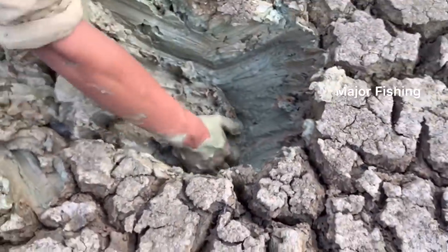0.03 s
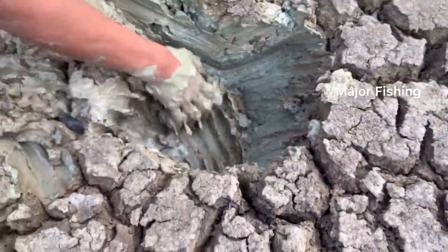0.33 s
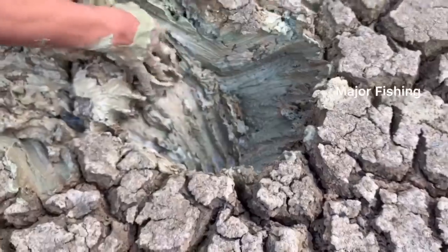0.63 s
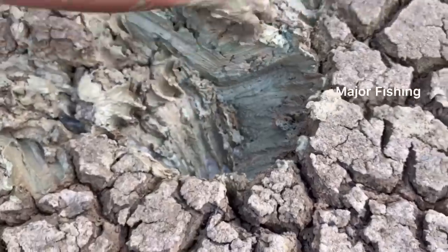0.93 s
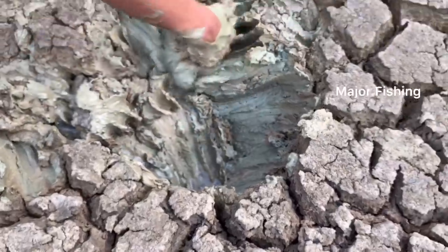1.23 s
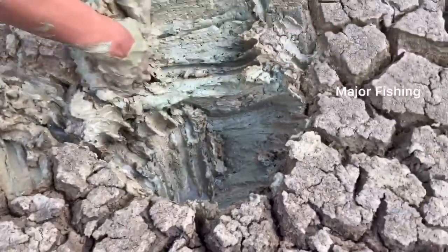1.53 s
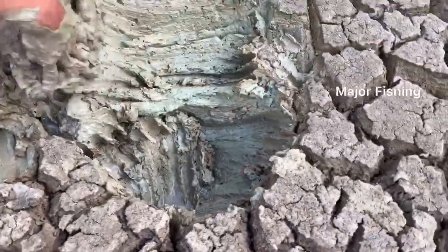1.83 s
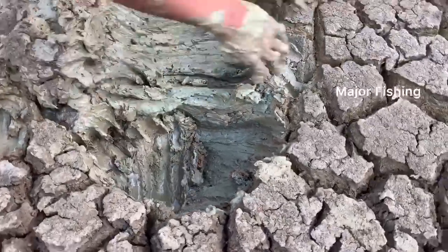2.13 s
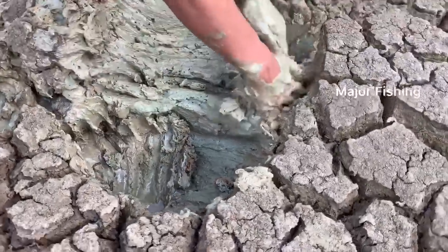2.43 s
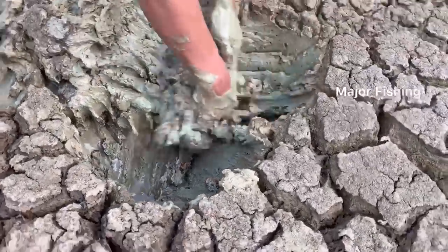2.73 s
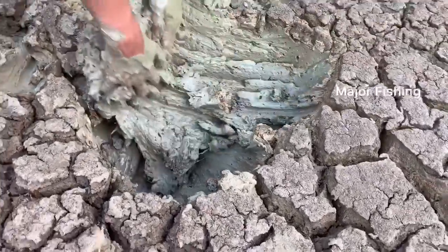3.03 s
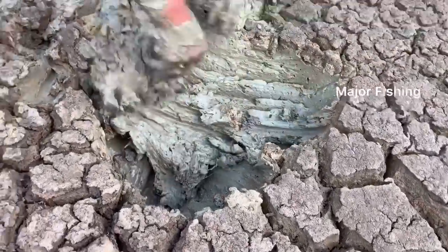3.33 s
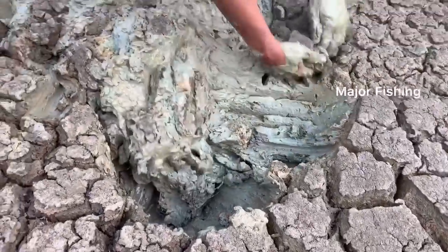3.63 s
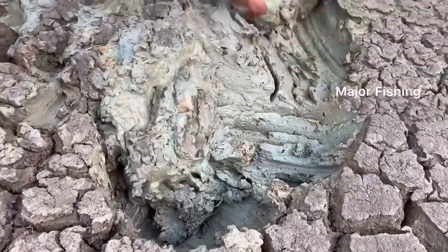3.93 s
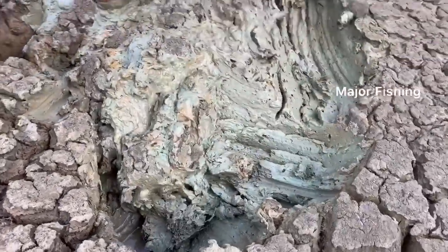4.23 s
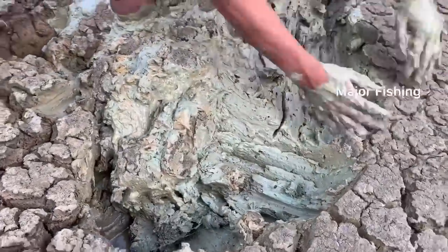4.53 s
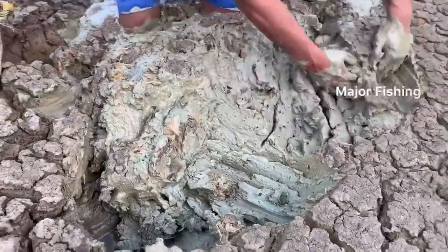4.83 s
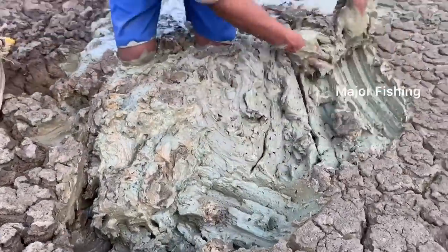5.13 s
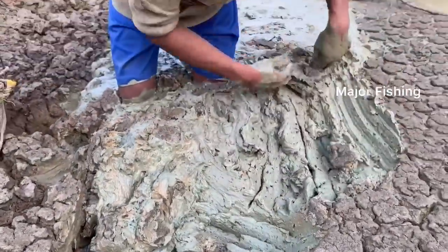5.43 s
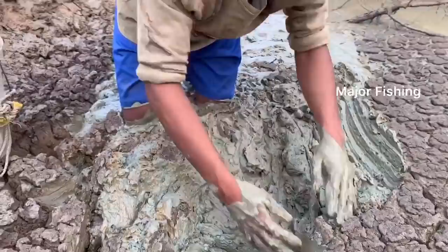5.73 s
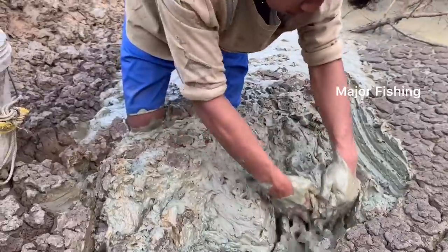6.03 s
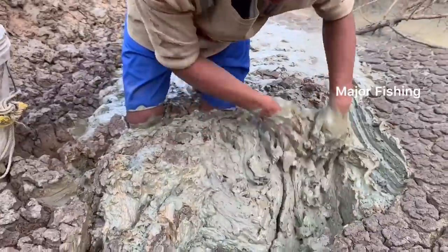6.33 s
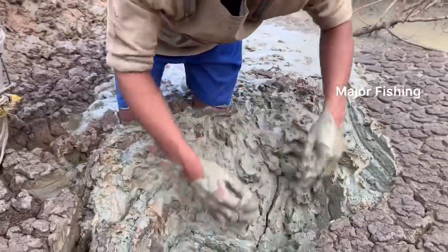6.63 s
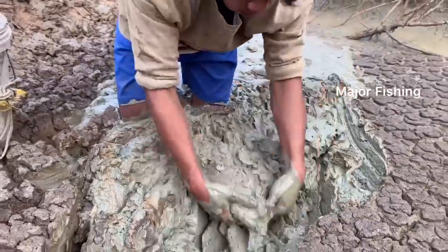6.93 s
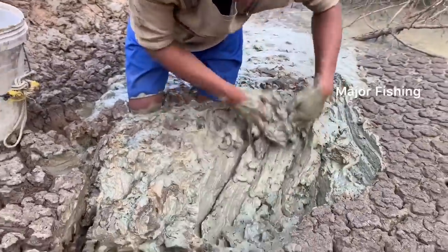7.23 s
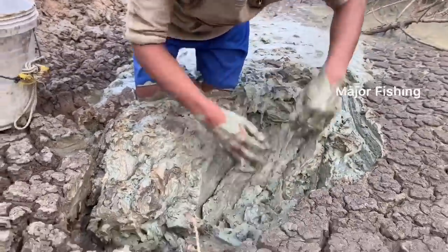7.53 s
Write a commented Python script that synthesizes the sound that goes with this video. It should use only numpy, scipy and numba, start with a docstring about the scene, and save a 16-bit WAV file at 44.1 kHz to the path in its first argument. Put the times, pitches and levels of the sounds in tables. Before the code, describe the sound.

Bare hands work wet, sticky clay outdoors, about a metre from a hand-held microphone, in uneven strokes with short lulls. For the first second, light smearing gives a fine crackle over a thin wet hiss. From 1 second the hands dig harder and air pockets pop and smack, easing around 2 seconds, then peaking in a loud squelching smack at 2.7 seconds. From about 3.4 to 5.2 seconds, flat palms swish over the slurry among more pops and small plops. Soft low handling thumps and faint rumble come and go, strongest from 4.5 to 6 seconds. Sticky strokes continue, with tiny suction squeaks near 6.3 seconds and brief wet spits around 6.7 to 6.9 seconds. Lighter strokes and plops carry on until nearly 8 seconds. The clay ticks faintly after each stroke, over a barely audible outdoor hush.

```python
"""Bare hands smear wet, sticky clay over cracked ground, outdoors, a metre from a hand-held camera.
Light strokes come first: tiny air pockets tear open and crackle over the hiss of the wet film.
From 1 s the hands dig harder; larger pockets pop and smack, loudest at 2.7 s. From 3.4 s flat palms
swish on the slurry. The camera body thumps softly as it is moved, most from 4.5 to 6 s. Closing gaps
squeak near 6.3 s, and the last strokes spit and plop. The open air stays almost still throughout."""
import sys
import numpy as np
from scipy import signal
from scipy.fft import rfft, irfft, next_fast_len
from scipy.io import wavfile
from numba import njit

SR = 44100
rng = np.random.default_rng(int(sys.argv[2]) if len(sys.argv) > 2 else 0)


def bounce(signal):
    """Save signal as a 16-bit WAV file at the path given by the first command-line argument."""
    frames = np.transpose(np.atleast_2d(signal))
    limited = np.clip(frames, -1, 1)
    pcm = np.round(limited * 32767).astype(np.int16)
    wavfile.write(sys.argv[1], SR, pcm)


N = 343539
PORT_LAG_S = .000065  # left microphone port leads
LOW_PAN_DB = 1.5  # low pops and squelch; every pan is left minus right

ATTACK_DB_PER_S, RELEASE_DB_PER_S, TICKING_DB_PER_S = 329, 150, 42
# clay at rest: drag/dB, fine crackle/dB, squelch/dB
REST_DB = [-84, -91, -88]
# ticking after a stroke, re that stroke: drag/dB, fine crackle/dB, squelch/dB
AFTER_STROKE_DB = [-19, -9.5, -36]
# hand strokes: t/s, length/s, drag level/dB, swell/dB, fine/dB re drag, squelch/dB re drag, pan/dB
HAND_STROKES = [(0.019, .64, -65.5, 2, 3.5, -14, -1), (0.72, .07, -71, -3, 4, -16, -2),
                (1.0, .05, -63, 6, 4.5, -15, -4), (1.07, .37, -54.5, 3, 1, -7, -2),
                (1.499, .05, -56, -3, -0.5, -15, -1), (1.619, .26, -64, -1.5, 3.5, -25, -0.5),
                (1.94, .14, -67, -3, -0.5, -13.5, 0), (2.194, .04, -69, -0.5, 8.5, -21, -3),
                (2.35, .25, -52.5, 0, 0, -25, -4), (2.678, .09, -49, 0, 0.5, -4, -6.5),
                (2.812, .09, -54.5, -1, 4, 1.5, -0.5), (3.041, .09, -60.5, 1, 7, -11.5, -2),
                (3.198, .03, -58, -0.5, -1.5, -16, 0), (3.4, .11, -66, 5, 3, -27, -4),
                (3.562, .16, -50, 4, -0.5, -11, -0.5), (3.749, .19, -47, 2, -3.5, -15, -7),
                (4.021, .3, -62.5, -7, 3, -17, -1), (4.61, .12, -52, -2, -1, -12.5, -10.5),
                (4.78, .43, -57.5, -1, 0.5, -14, -2), (5.271, .1, -69, -3, 8.5, -22, -4),
                (5.504, .03, -66, -6, -2, -4, -4), (5.809, .11, -57, 5, -1.5, -20, -2),
                (5.965, .23, -52, 1, -3.5, -34, -4), (6.242, .03, -57, -2, -5, -26, 8),
                (6.35, .08, -58, 1, -5, -5.5, 0), (6.519, .03, -64, -1, 0.5, -30, 10),
                (6.77, .08, -52.5, 2, -5, -12, 0), (6.967, .11, -58, -1, 0.5, -6.5, 1.5),
                (7.16, .23, -65, -1, 0, -30, -1), (7.576, .02, -65, 0, 1, -6, 11),
                (7.73, .06, -62, 4.5, -3, -3.5, 9)]


def stroking():
    """Hands dig in, hold and let go; the clay ticks on. Returns drag, fine, squelch and pan in dB."""
    t = np.arange(0, N, 32) / SR
    layers = undb(REST_DB)[:, None] ** 2
    weighted_pan = 0
    for start, length, db, swell_db, fine_db, squelch_db, pan_db in HAND_STROKES:
        held_db = db + swell_db * (np.clip((t - start) / length, 0, 1) - .5)
        held_db -= ATTACK_DB_PER_S * np.maximum(start - t, 0)
        after_s = np.maximum(t - start - length, 0)
        ticking_db = np.array(AFTER_STROKE_DB)[:, None] - TICKING_DB_PER_S * after_s
        power = undb(held_db - RELEASE_DB_PER_S * after_s) ** 2 + undb(held_db + ticking_db) ** 2
        layers = layers + power * undb([0, fine_db, squelch_db])[:, None] ** 2
        weighted_pan = weighted_pan + power[0] * pan_db
    return curves(np.transpose([t, *(10 * np.log10(layers)), weighted_pan / layers[0]]))


FILM_DB, FILM_DB_PER_DB = -2.5, 0.067  # hiss re crackle at peak drag; slope with drag
FACING_DB_PER_DB = 0.032  # extra rasp as a hand faces one port
# smeared clay as heard through the camera's microphone, with its treble notches: f/Hz, level/dB
CLAY_THROUGH_MIC = [(88, -12.5), (150, 6.5), (376, 5), (637, -8), (759, -3.5), (1240, -6), (1690, -4),
                    (3160, -5.5), (5250, -10), (6260, -5), (9080, -9.5), (10400, -5), (11900, -23.5),
                    (13400, -7), (16000, -50)]


def smearing(drag_db, fine_db, squelch_db, pan_db):
    """Hands stick and slip through the clay: crackle over the hiss of the wet film."""
    slip = undb(3 * walk(260) + 2 * walk(70))
    grains = crackle(undb(.35 * drag_db), slip ** 2, cycles=1.48, spread_db=5,
                     pan_spread_db=-2.0, lag_spread_s=.00005, count=48000)
    stereo_treble = colour(rng.standard_normal((2, N)), [(300, -29.0), (1500, 12.5), (4000, 9.5)])
    film = unit(slip * (rng.standard_normal(N) + stereo_treble))
    film_db = FILM_DB + FILM_DB_PER_DB * (drag_db - drag_db.max())
    clay = colour(grains + undb(film_db) * film, CLAY_THROUGH_MIC)
    # deep folds squelch, finger furrows crackle, thin slurry fizzes
    squelch = unit(colour(clay, [(150, 3.0), (500, 6.0), (800, -37.0), (1400, -62), (3000, -91)]))
    furrows = unit(colour(clay, [(250, -10.5), (500, 5.5), (750, 11.5), (3800, 11.5),
                                 (6000, -9.0), (12000, -26.0)]))
    fizz = unit(colour(clay, [(1500, -92), (3200, -4.0), (5000, 4.5)]))
    # the camera body shades the far port's treble
    treble = colour(furrows, [(900, -40), (1700, -10), (2600, 0)])
    furrows += (undb(sides(pan_db) + FACING_DB_PER_DB * np.abs(pan_db)) - 1) * treble
    return (squelch * undb(squelch_db + sides(LOW_PAN_DB))
            + furrows * undb(drag_db)
            + fizz * undb(fine_db + 0.21 * sides(pan_db)))


def crackle(pace, flurry, cycles, spread_db, pan_spread_db, lag_spread_s, count):
    """Tiny air pockets tear open: dense in a hard stroke, lone ticks as the clay settles."""
    when, pitch, tear, sign = rng.random((count, 4)).T
    length, pan, lag = rng.standard_normal((count, 3)).T
    t = np.arange(N) / SR
    chance = np.cumsum(pace * flurry)
    start = np.interp(when, chance / chance[-1], t)
    hz = 120 + 15000 * pitch ** 2.4
    # heavy-tailed sizes, weighted to even out power over pitch and pace
    size_db = spread_db * np.minimum(hz / 1200, 1) ** 0.4 * np.minimum(-np.log(1 - tear), 4.8)
    gain = np.sign(sign - .5) * undb(size_db) * hz ** 0.31 / np.sqrt(np.interp(start, t, pace))
    ring_cycles = cycles * (hz / 2000) ** .5 * undb(2.89 * length)
    return unit(at_ports(start, gain, hz, ring_cycles, glide=0.0094, pan_db=pan_spread_db * pan * pitch,
                         lag_s=PORT_LAG_S + lag_spread_s * lag))


POCKET_GLIDE, SHADE_HZ = .12, 2320  # the camera body shades the far port above SHADE_HZ
GULP_DELAY_S, GULP_DB, GULP_PITCH_RATIO = 0.0012, -20.5, 0.485
# largest pockets: t/s, peak level/dB, f/Hz, rise/cycles
POCKET_POPS = [(0.063, -42.5, 1090, 0.99), (0.241, -37, 1885, 0.25), (0.2645, -41, 1690, 0.51),
               (0.3164, -35.5, 4210, 1.34), (0.567, -37.5, 1530, 0.52), (0.6037, -26.5, 5050, 3.5),
               (0.7255, -42, 5000, 1.3), (0.788, -49, 8250, 2), (0.8739, -39, 1380, 1.17),
               (1.031, -40, 3200, 1.3), (1.038, -39, 3166, 1.1), (1.0715, -30, 1710, 1.7),
               (1.0796, -31.5, 1700, 1.44), (1.133, -32, 1500, 1.44), (1.2073, -31.5, 1430, 0.49),
               (1.2454, -28, 2140, 0.34), (1.2541, -28, 2100, 0.83), (1.3253, -22, 6330, 8.6),
               (1.3568, -27, 2090, 1.03), (1.4061, -23.5, 1940, 1.06), (1.4309, -30, 1680, 2.3),
               (1.4594, -29, 3500, 0.88), (1.5135, -27.5, 4250, 3.2), (2.1338, -28, 4370, 1.04),
               (2.3514, -25.5, 3500, 1.1), (2.3852, -25, 1560, 0.97), (2.3878, -25, 1650, 1.43),
               (2.4361, -30.5, 2700, 0.65), (2.4475, -23.5, 1290, 0.55), (2.4546, -25.5, 1330, 1.5),
               (2.497, -27, 7750, 4.8), (2.539, -26, 1290, 0.26), (2.5803, -28, 1490, 0.72),
               (2.5967, -34, 1620, 0.53), (2.6334, -28, 1580, 1.3), (2.6792, -24.5, 1680, 0.32),
               (2.6892, -30, 2060, 0.49), (2.6973, -13, 1740, 1.11), (2.7071, -25, 4600, 0.63),
               (2.7362, -33, 1610, 0.68), (2.7524, -20.5, 2320, 1.35), (2.7633, -32, 2450, 1.2),
               (2.7851, -30, 4600, 3.8), (2.814, -27.5, 6020, 8.2), (2.8428, -23, 1520, 0.52),
               (2.872, -26.5, 2510, 1.6), (2.907, -29, 1920, 0.81), (2.9115, -22, 1390, 1.76),
               (3.042, -31, 3440, 1.25), (3.0557, -34, 1040, 0.85), (3.079, -31, 5400, 2.8),
               (3.2, -32.5, 6200, 3.7), (3.6396, -35, 2980, 1.46), (3.676, -24.5, 2620, 0.54),
               (3.7486, -30, 2430, 0.58), (3.7558, -24, 1710, 0.87), (3.7653, -28, 2240, 1.34),
               (3.7872, -29, 2930, 1.4), (3.809, -26, 2280, 0.74), (3.8171, -26, 2010, 0.96),
               (3.8393, -28, 2150, 0.88), (3.8643, -25, 2670, 1.2), (3.9043, -30, 2180, 1.4),
               (3.9075, -23.5, 3080, 1.3), (3.9159, -18, 2550, 0.55), (3.93, -23.5, 2320, 1.25),
               (3.9692, -24.5, 3400, 1.7), (4.058, -32, 1150, 0.47), (4.137, -32, 3350, 0.75),
               (4.38, -40, 3320, 0.61), (4.56, -28.5, 3100, 0.97), (4.6177, -25.5, 2780, 2.7),
               (4.6306, -23.5, 2640, 0.98), (4.6362, -23, 3600, 1.16), (4.678, -25, 3370, 1.5),
               (4.721, -28.5, 2070, 2.1), (4.7234, -25.5, 3580, 1.4), (4.7509, -33.5, 3550, 1.5),
               (4.8527, -31, 1590, 0.69), (4.8725, -34, 1500, 0.5), (4.984, -34.5, 3320, 1),
               (5.061, -33, 3540, 0.92), (5.0846, -40.5, 1600, 3.1), (5.2895, -29.5, 6340, 3.1),
               (5.3525, -45, 6000, 2.2), (5.391, -39.5, 4460, 2), (5.5013, -37, 1460, 0.32),
               (5.669, -45, 1580, 0.78), (5.7892, -29.5, 1710, 0.94), (5.848, -35.5, 2800, 2.1),
               (5.8935, -36.5, 1220, 1.3), (5.9307, -26.5, 2570, 0.62), (5.9888, -26, 3130, 2.2),
               (6.0167, -34, 2610, 1), (6.077, -30.5, 2780, 1.1), (6.0802, -26, 2330, 0.57),
               (6.0955, -26.5, 1680, 0.77), (6.114, -29.5, 1670, 1.8), (6.1544, -33, 1690, 1.2),
               (6.172, -30, 2600, 2.6), (6.1745, -34, 1650, 1.8), (6.1956, -32, 1140, 0.72),
               (6.2177, -41, 3000, 2.6), (6.3512, -35, 2330, 0.78), (6.377, -33.5, 1730, 0.63),
               (6.3964, -28, 1530, 1.5), (6.4133, -32, 1240, 1.43), (6.447, -37.5, 1520, 0.57),
               (6.7808, -31, 1920, 1.6), (6.8774, -35, 1960, 3.9), (7.0142, -27, 1650, 0.86),
               (7.0418, -26, 1850, 0.97), (7.045, -29.5, 1430, 0.8), (7.0921, -33, 1440, 1.1),
               (7.7678, -30.5, 2230, 0.81), (7.7695, -32.5, 1430, 0.94)]


def popping(drag_db, hand_pan_db):
    """Large pockets burst, ring briefly and gulp at a lower, sinking pitch as they open wider."""
    start, db, hz, cycles = np.vstack([POCKET_POPS, middling_pops(drag_db, count=90)]).T.copy()
    cycles = np.maximum(cycles, .3)
    shade = 1 / (1 + (SHADE_HZ / hz) ** 4)
    pan_db = LOW_PAN_DB * (1 - shade) + shade * np.interp(start, np.arange(N) / SR, hand_pan_db)
    glide = POCKET_GLIDE * (2 * rng.random(len(hz)) - 1)
    cavities = at_ports(start, undb(db), hz, cycles, glide, pan_db)
    threads = shredding(start, db, hz, pan_db, count=12)
    gulps = at_ports(start + GULP_DELAY_S, undb(db + GULP_DB) * (1 - shade), hz * GULP_PITCH_RATIO,
                     cycles=1.654, glide=-0.12, pan_db=LOW_PAN_DB)
    return cavities + threads + gulps


POP_OVER_DRAG_DB, POP_SCATTER_DB = 8.5, 9.5
POP_HZ, POP_SCATTER_OCTAVES, POP_CYCLES = 1960, 0.59, 1.29


def middling_pops(drag_db, count):
    """Middling pockets burst by chance, oftener and louder with drag. Rows as in POCKET_POPS."""
    when = rng.random(count)
    size, pitch, length = np.clip(rng.standard_normal((count, 3)).T, -2, 2)
    chance = np.cumsum(undb(.8 * drag_db))
    at = np.searchsorted(chance / chance[-1], when)
    db = drag_db[at] + POP_OVER_DRAG_DB + POP_SCATTER_DB * np.minimum(size, 1)
    hz = np.minimum(POP_HZ * 2 ** (POP_SCATTER_OCTAVES * pitch), SR / 4)
    cycles = POP_CYCLES * (hz / POP_HZ) ** .5 * undb(2 * length)
    return np.transpose([at / SR, db, hz, cycles])


SHRED_DB, SHRED_FADE_DB, SHRED_RUN_S = -12, 9, .004
SHRED_SCATTER_OCTAVES, SHRED_CYCLES = .5, 0.79


def shredding(start, db, hz, pan_db, count):
    """Clay threads snap in a quick, fading run after each burst: the rough edge of the smack."""
    start, db, hz, pan_db = np.repeat([start, db, hz, pan_db], count, axis=1)
    when, pitch, size, sign = rng.standard_normal((len(start), 4)).T
    when = when + .5
    late = np.abs(when)
    delay_s = SHRED_RUN_S * np.maximum(when, -late / 2)  # a few snap just before the burst
    thread_hz = np.minimum(hz * 2 ** (SHRED_SCATTER_OCTAVES * np.clip(pitch, -2, 2)), SR / 4)
    gain = np.sign(sign) * undb(db + SHRED_DB - SHRED_FADE_DB * late + np.minimum(2 * size, 2))
    cycles = SHRED_CYCLES * (thread_hz / POP_HZ) ** .5
    return at_ports(start + delay_s, gain, thread_hz, cycles, glide=0, pan_db=pan_db)


SLIDE_TRIM_DB, SLIDE_FLUTTER_DB, SLIDE_GRIT_DB, SLIDE_FADE_S = -5.5, 3.5, 1, 0.028
SWISH_WIDTH_SHARE, PALM_HZ, PALM_WIDTH_SHARE = 1.58, 754., 0.18
# palm slides: t/s, length/s, level before trim/dB, start f/Hz, end f/Hz, hollow/dB re swish, pan/dB
PALM_SLIDES = [(3.387, 0.37, -54.5, 1650, 2100, -10, 2), (3.679, 0.24, -54, 2700, 3140, -1.5, -12),
               (4.606, 0.12, -42.5, 3500, 3350, -27, -5.5), (4.801, 0.4, -58, 1900, 3120, -7.5, 2),
               (7.154, 0.19, -65, 1670, 1480, -2, 10), (7.399, 0.2, -61, 1653, 2220, -10.5, 7),
               (7.562, 0.025, -57.5, 2887, 3340, -3, 1)]


def sliding():
    """A palm glides on slurry: the swish's resonance moves with the gap, over the palm's hollow."""
    out = np.zeros((2, N))
    for start, length, db, from_hz, to_hz, palm_db, pan_db in PALM_SLIDES:
        span = np.arange(int((start - .1) * SR), min(int((start + length + .1) * SR), N))
        age = span / SR - start
        hz = np.interp(age, [0, length], [from_hz, to_hz])
        outside_s = np.maximum(-age, 0) + np.maximum(age - length, 0)
        rough_db = SLIDE_FLUTTER_DB * walk(300)[span] + SLIDE_GRIT_DB * walk(1500)[span]
        envelope = np.exp(-outside_s / SLIDE_FADE_S) * undb(db + rough_db + SLIDE_TRIM_DB)
        shared, left, right, deep = rng.standard_normal((4, N // 8))[:, :len(span)]
        swish = shared + 2.8 * np.array([left, right])
        for _ in range(2):
            swish = np.array([resonance(port, hz, SWISH_WIDTH_SHARE) for port in swish])
        hollow = unit(resonance(deep, np.full(len(span), PALM_HZ), PALM_WIDTH_SHARE))
        out[:, span] += envelope * (unit(swish) * undb(sides(pan_db)) + undb(palm_db) * hollow)
    return out


# spit spectrum: f/Hz, level/dB
SPIT_SPECTRUM = [(300, -27), (1800, 13), (7000, 8), (10500, 4), (12000, 0), (13500, 7), (16000, -15)]
# suction releases: t/s, peak rms level/dB, rise/s, pan/dB
SUCTION_SPITS = [(1.709, -43, 0.00083, -2), (2.132, -45, 0.00069, 1), (2.187, -56, 0.00084, 2),
                 (2.214, -54, 0.0016, 0), (5.4469, -43, 0.00013, -2), (5.64, -46, 0.00058, 3),
                 (5.65, -56, 0.00082, -1), (5.786, -39.5, 0.0014, -1), (6.703, -47.5, 0.0028, -1),
                 (6.712, -40.5, 0.0014, 4), (6.9014, -36.5, 0.0006, 5)]


def spitting():
    """A palm pulls free and the film between skin and clay spits."""
    envelope = np.zeros((2, N))
    for start, db, rise_s, pan_db in SUCTION_SPITS:
        first = int(start * SR)
        age = np.arange(1024) / SR / rise_s
        envelope[:, first:first + len(age)] += age * np.exp(1 - age) * undb(db + sides(pan_db))
    noise = rng.standard_normal(N) + 6.0 * rng.standard_normal((2, N))
    return envelope * unit(colour(noise, SPIT_SPECTRUM))


# mud lumps: t/s, peak level/dB, f/Hz
MUD_PLOPS = [(0.597, -53, 597), (0.689, -50.5, 610), (2.698, -32, 796), (3.679, -42, 785),
             (3.819, -43, 840), (3.866, -46, 810), (3.922, -38.5, 756), (4.944, -41.5, 810),
             (6.976, -41, 1300), (6.782, -48.5, 724), (7.046, -49.5, 716), (7.071, -39, 895),
             (7.094, -48, 800), (7.336, -48.5, 890), (7.665, -44.5, 1510)]


def plopping():
    """Soft lumps of mud plop, each falling in pitch."""
    start, db, hz = np.transpose(MUD_PLOPS).copy()
    return at_ports(start, undb(db), hz, cycles=2.2, glide=-0.344, pan_db=0)


# closing gaps: t/s, peak level/dB, f/Hz
GAP_SQUEAKS = [(6.23, -40.5, 1534), (6.241, -38, 2590), (6.305, -45.5, 2140), (6.364, -45, 3800)]


def squeaking():
    """Suction squeaks, rising in pitch as a gap closes."""
    start, db, hz = np.transpose(GAP_SQUEAKS).copy()
    return at_ports(start, undb(db), hz, cycles=6.3, glide=0.12, pan_db=-5)


KNOCK_CYCLES, KNOCK_ONSET, FIRM_KNOCK_DB = 1.02, 1.46, -38
CASE_HZ, CASE_CYCLES, CASE_DB, CASE_DB_PER_DB = 174.5, 2.1, -50, 1.23  # CASE_DB in a firm knock
# grip knocks: crest t/s, peak level/dB, f/Hz
GRIP_KNOCKS = [(1.02, -45, 63.8), (1.058, -43, 69.6), (1.77, -46, 111), (1.793, -44, 68.6),
               (1.842, -42.5, 62.5), (1.883, -44.5, 78.5), (1.969, -48.5, 68), (2.124, -46, 67),
               (2.506, -43.5, 72.6), (2.622, -38, 62.3), (2.982, -37.5, 68.4), (3.704, -42.5, 66),
               (4.482, -38.5, 170), (4.489, -32.5, 61.5), (4.928, -42.5, 58), (5.091, -40, 90),
               (5.125, -29.5, 69), (5.154, -33.5, 60), (5.417, -35.5, 250), (5.429, -30, 66),
               (5.476, -37, 117), (5.859, -45, 62.6), (5.991, -25.5, 70.5), (6.048, -31, 81),
               (6.106, -43, 84), (6.275, -43.5, 67.5), (6.669, -46, 72.6), (7.121, -43, 60),
               (7.305, -43, 66.7), (7.462, -41, 64.5)]


def knocking():
    """The soft hand knocks the camera body and rings a stiff case mode, alike at both ports."""
    crest, db, hz = np.transpose(GRIP_KNOCKS).copy()
    each = np.ones(len(hz))
    knocks = rings(crest - KNOCK_CYCLES / hz, undb(db), hz, KNOCK_CYCLES * each,
                   glide=-0.083 * each, onset=KNOCK_ONSET)
    case_db = CASE_DB + CASE_DB_PER_DB * (db - FIRM_KNOCK_DB)
    case = rings(crest - CASE_CYCLES / CASE_HZ, undb(case_db), CASE_HZ * each, CASE_CYCLES * each,
                 glide=-0.39 * each, onset=KNOCK_ONSET)
    return knocks + case


GRIP_WAVER_DB = 5
# camera body spectrum: f/Hz, level/dB
BODY_SPECTRUM = [(18, -37), (35, -4.5), (60, -2), (90, -5), (150, -16), (300, -29), (800, -51)]
# shifting grip: t/s, level/dB
GRIP_LEVELS = [(0, -77.5), (.9, -71), (1.08, -62), (1.62, -70.5), (1.8, -55), (2.03, -68), (2.45, -55.5),
               (2.87, -52), (3.07, -70), (3.5, -78.5), (3.65, -56.5), (4.02, -70), (4.35, -56),
               (4.85, -67.5), (5.2, -49), (5.32, -60.5), (5.47, -56), (5.6, -61), (5.76, -55.5),
               (6.12, -48.5), (6.35, -53.5), (6.55, -74.5), (6.82, -58.5), (7.0, -65), (7.3, -58),
               (7.79, -62)]


def rubbing():
    """The shifting grip rumbles unevenly through the camera body."""
    grip_db, = curves(GRIP_LEVELS)
    rumble = unit(colour(rng.standard_normal(N), BODY_SPECTRUM))
    return rumble * undb(grip_db + GRIP_WAVER_DB * walk(18))


AIR_DB = -75
# faint outdoor hush as heard through the camera's microphone, notched near 12 kHz: f/Hz, level/dB
HUSH_THROUGH_MIC = [(20, -15), (70, -32), (300, -6), (1400, -3.5), (6500, -9.5), (10500, -31), (12000, -30),
                    (13500, -13), (16000, -66)]


def open_air():
    """A faint, steady outdoor hush."""
    noise = rng.standard_normal(N) + .5 * rng.standard_normal((2, N))
    return undb(AIR_DB) * unit(colour(noise, HUSH_THROUGH_MIC))


def ground(x, wet_db, t60_s, change_hz, count):
    """Clods and pit walls add a very short tail, whose paths change as the hands move."""
    t = np.arange(1024) / SR
    envelope = undb(-60 * t / t60_s) * (1 - np.exp(-t / 0.00019))
    scatter = 0
    for _ in range(count):
        shared, left, right = rng.standard_normal((3, len(t)))
        tails = (shared + 0.048 * np.array([left, right])) * envelope
        tails /= np.sqrt(count * np.mean(np.sum(tails ** 2, axis=1)))
        echoes = np.array([signal.oaconvolve(port, tail)[:N] for port, tail in zip(x, tails)])
        scatter = scatter + walk(change_hz) * echoes
    return x + undb(wet_db) * scatter


BEND_SHARE, BEND_HZ = 0.29, 1720


def at_ports(start, gain, hz, cycles, glide, pan_db, lag_s=PORT_LAG_S):
    """Rings at the left and right ports; long waves bend round the body and lag more."""
    delay_s = lag_s * (1 + BEND_SHARE / (1 + (hz / BEND_HZ) ** 2))
    each = np.ones(len(hz))
    return np.array([rings(start - side * delay_s / 2, gain * undb(side * pan_db / 2), hz,
                           cycles * each, glide * each, onset=2.46) for side in (1, -1)])


@njit
def rings(start, gain, hz, cycles, glide, onset):
    """Tones swell for `cycles` and die away. Glide: pitch share per rise time. High onset: soft start."""
    out = np.zeros(N)
    for k in range(len(start)):
        rise_s = cycles[k] / hz[k]
        for i in range(max(int(start[k] * SR) + 1, 0), min(int((start[k] + 6 * rise_s) * SR), N)):
            age = (i / SR - start[k]) / rise_s
            turns = cycles[k] * (age - 1) * (1 + glide[k] * age / 2)
            out[i] += gain[k] * (age * np.exp(1 - age)) ** onset * np.cos(2 * np.pi * turns)
    return out


@njit
def resonance(x, hz, width_share):
    """Band-pass whose centre may move every sample."""
    out, band, low = np.empty(len(x)), 0., 0.
    for i in range(len(x)):
        g = np.tan(np.pi * hz[i] / SR)
        out[i] = (band + g * (x[i] - low)) / (1 + g * (g + width_share))
        band, low = 2 * out[i] - band, low + 2 * g * out[i]
    return out


def colour(x, points):
    """Filter by (f/Hz, level/dB) points."""
    size = next_fast_len(N + 4096)
    hz, db = np.transpose(points)
    bin_hz = np.maximum(np.arange(size // 2 + 1) * SR / size, 1)
    gain = undb(np.interp(np.log(bin_hz), np.log(hz), db))
    return irfft(rfft(x, size) * gain, size)[..., :N]


def walk(rate_hz):
    """Random curve, spread near 1, through rate_hz points a second."""
    values = rng.standard_normal(N // 8)
    return np.interp(np.arange(N) * rate_hz / SR, np.arange(len(values)), values)


def curves(table):
    """Rows of (t/s, values) to one per-sample curve a column."""
    times, *columns = np.transpose(table)
    return [np.interp(np.arange(N) / SR, times, column) for column in columns]


def sides(pan_db):
    """Pan to left and right offsets in dB."""
    return np.array([[.5], [-.5]]) * pan_db


def undb(db):
    """Decibels to gain."""
    return 10 ** (np.asarray(db) / 20)


def unit(x):
    """Scale to rms 1."""
    return x / np.sqrt(np.mean(x ** 2))


def scene():
    """The clay in its shallow pit, the camera body and the air."""
    drag_db, fine_db, squelch_db, pan_db = stroking()
    clay = smearing(drag_db, fine_db, squelch_db, pan_db) + popping(drag_db, pan_db)
    clay += sliding() + spitting() + plopping() + squeaking()
    pit = ground(clay, wet_db=-7.5, t60_s=0.064, change_hz=14, count=6)
    return pit + knocking() + rubbing() + open_air()


TOP_HZ = 15800


def record(dry):
    """The camera's steep low-pass."""
    return signal.sosfilt(signal.ellip(8, .2, 70, TOP_HZ, fs=SR, output="sos"), dry)


dry = scene()
out = record(dry)
bounce(out)
```